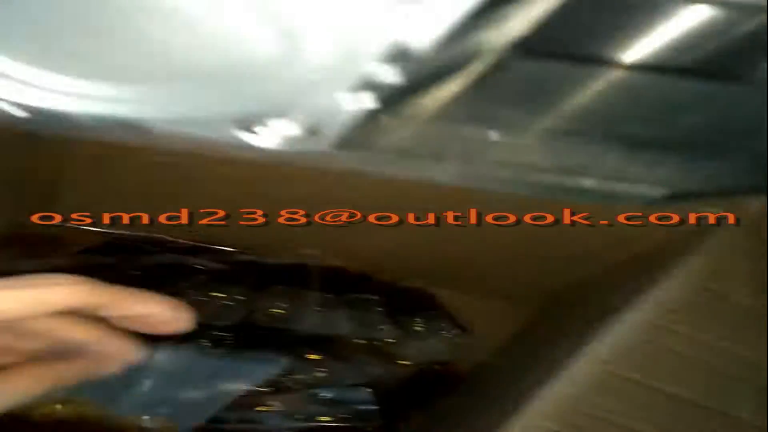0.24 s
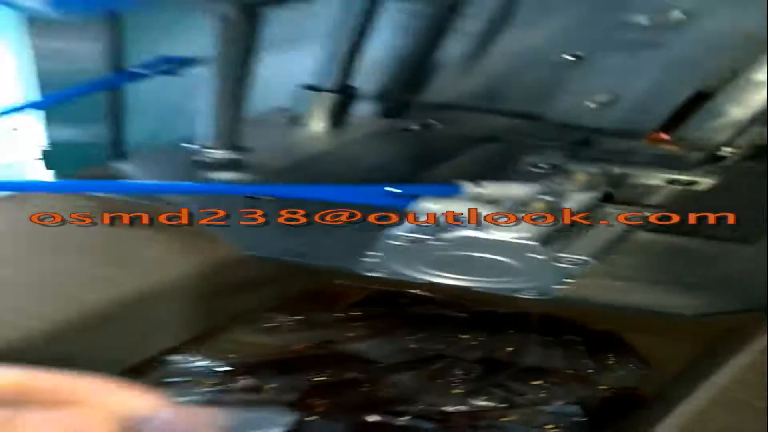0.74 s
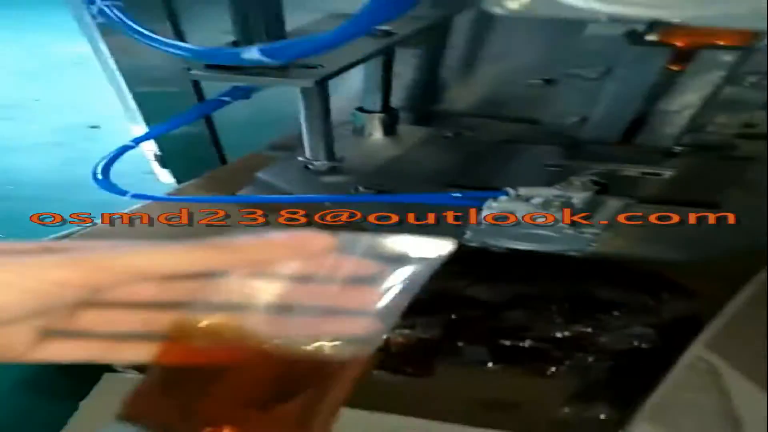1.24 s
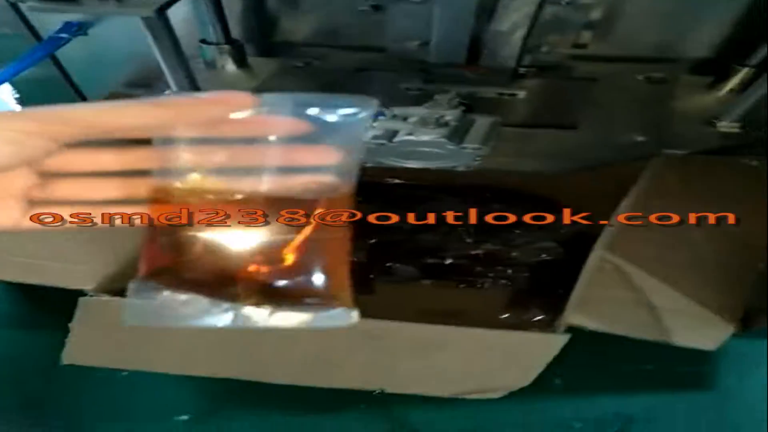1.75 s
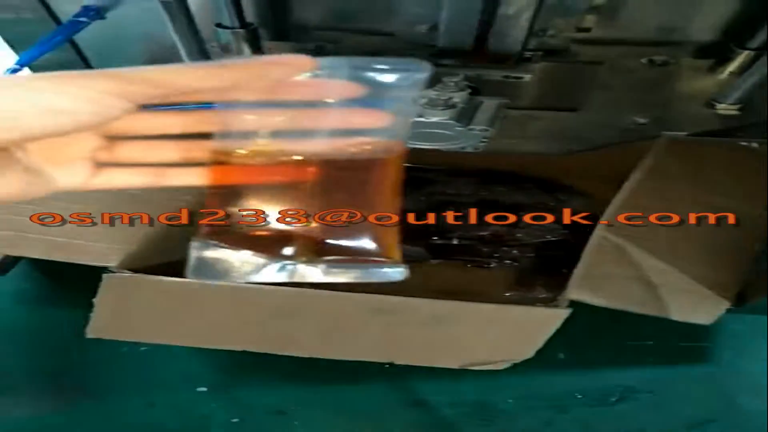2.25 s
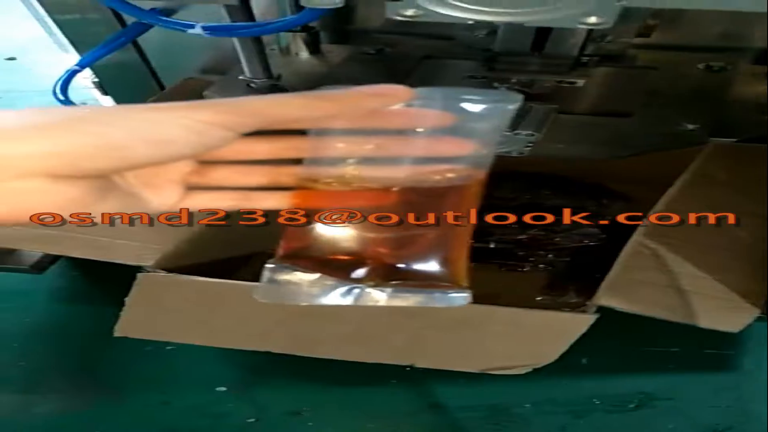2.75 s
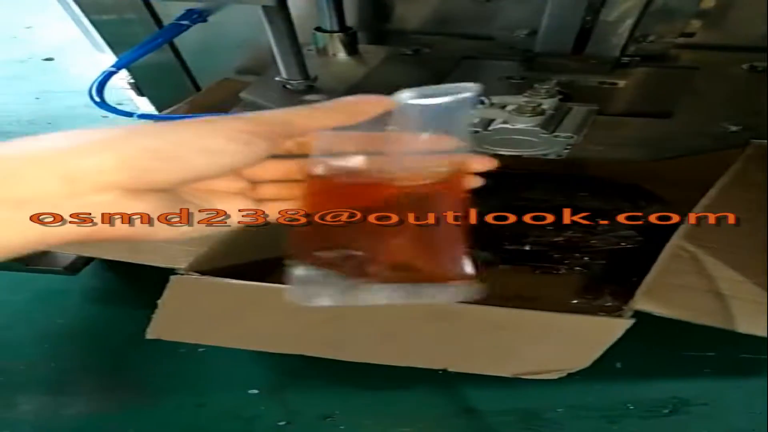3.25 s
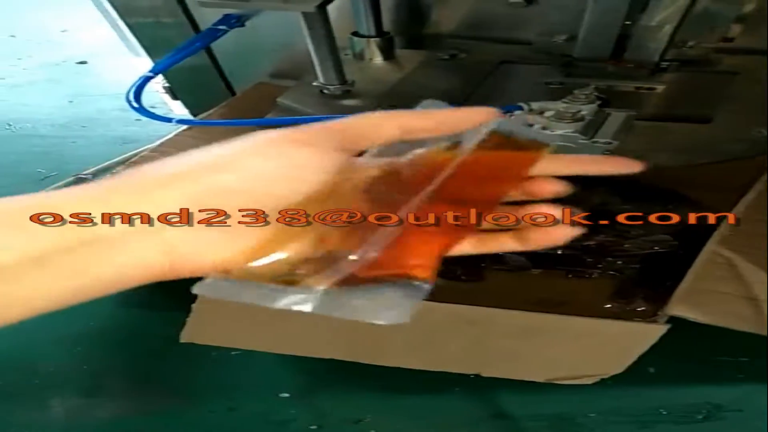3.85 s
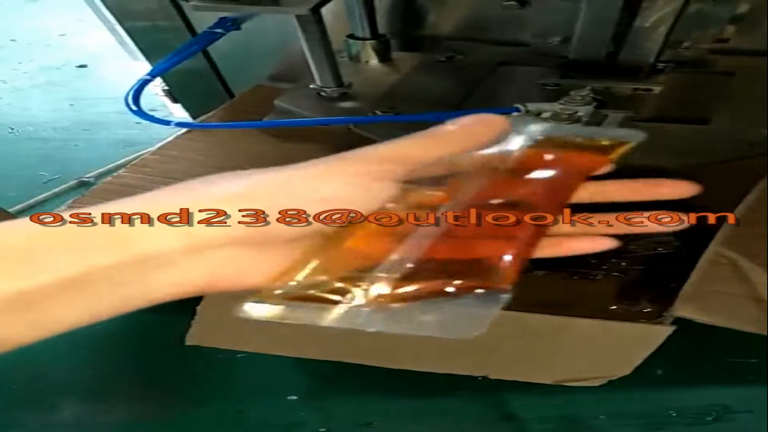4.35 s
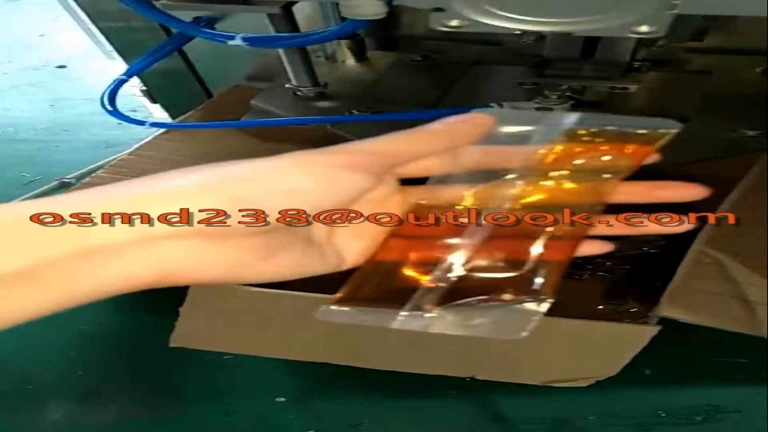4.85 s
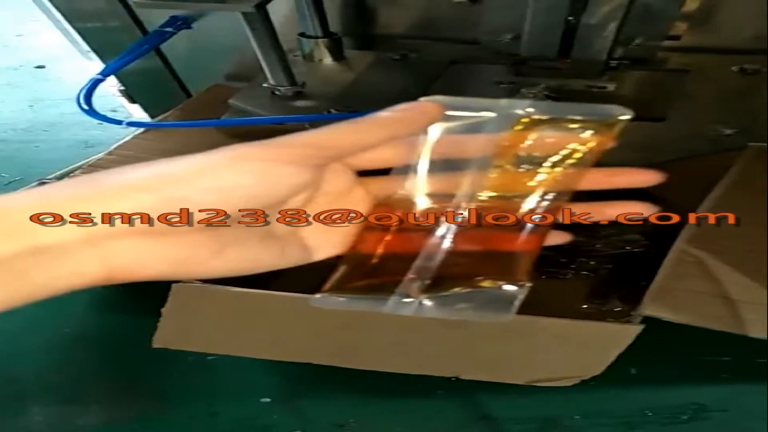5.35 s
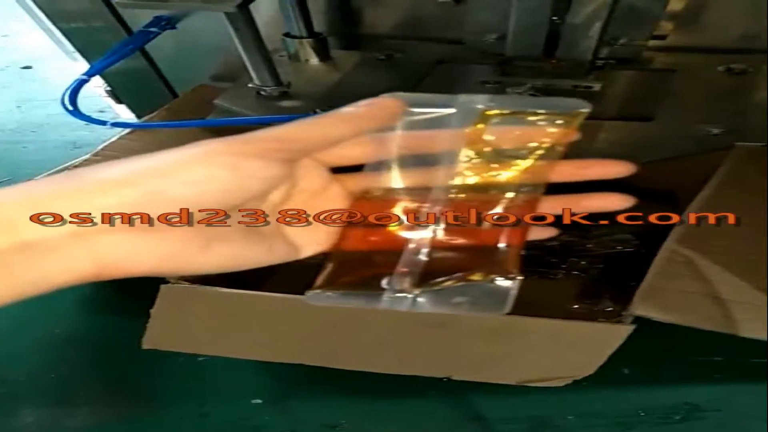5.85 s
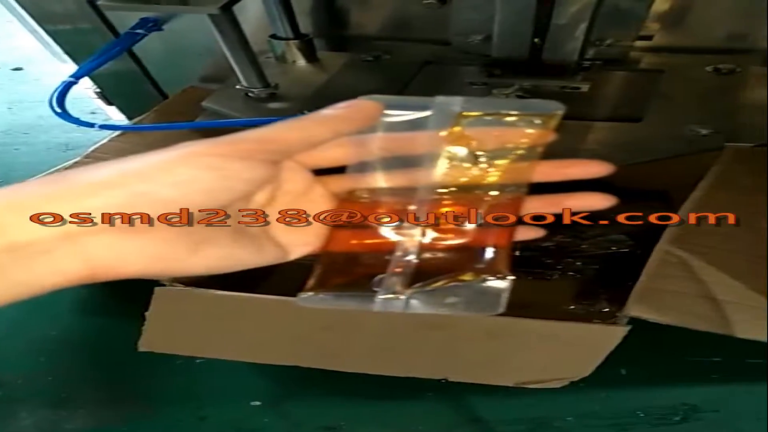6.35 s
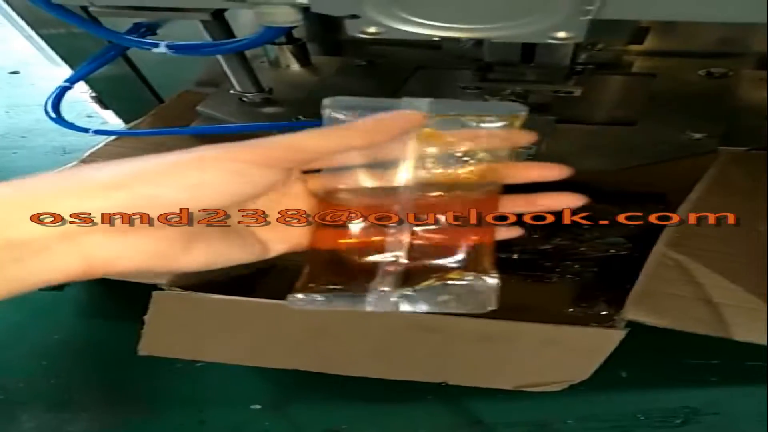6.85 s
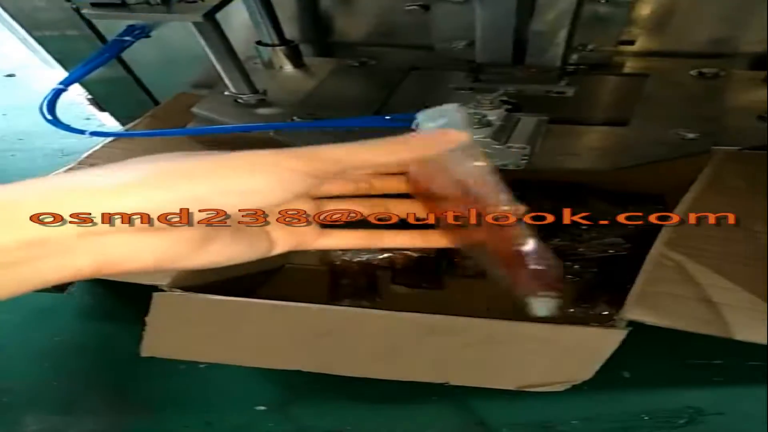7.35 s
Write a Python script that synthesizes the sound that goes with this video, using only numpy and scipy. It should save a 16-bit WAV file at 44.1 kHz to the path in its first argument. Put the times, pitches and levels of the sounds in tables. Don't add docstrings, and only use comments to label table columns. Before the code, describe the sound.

Steady factory machinery: whistling bursts of compressed air, hard metallic clacks, pinging parts and low frame thumps, with a thin air-leak whine behind.

```python
import sys
import numpy as np
from scipy import signal
from scipy.io import wavfile
from scipy.ndimage import uniform_filter1d

SR = 44100
rng = np.random.default_rng(int(sys.argv[2]) if len(sys.argv) > 2 else 0)


def materialize(psi):
    bounded = np.clip(np.atleast_2d(psi).T, -1, 1)
    quanta = np.round(bounded * 32767).astype(np.int16)
    wavfile.write(sys.argv[1], SR, quanta)


N = 335601
PORT_LAG = 20

# start_s, air_db, whistle_db, force_db, jaw_lag_s
CLOSE_STROKES = [(-.371, 2, 8, 3, -0.003), (1.630, 2, 2, -0.5, -0.0043), (3.629, 0.5, 2, 0, -.003),
                 (5.628, 1.5, 2, 1, -0.00029)]
EJECT_STROKES = [(.226, 0.29, 1, 1.1, 0), (2.232, 0.6, 0.84, -0.96, 0), (4.234, 0, 0.14, 0.58, 0),
                 (6.234, 0.026, -1.84, -0.62, 0)]
OPEN_STROKES = [(.677, 4.5, -1.7, 1, -0.0021), (2.675, 1.9, 1, 0, 0.0055), (4.676, 0.5, -0.93, 0.19, 0),
                (6.677, 2, -1.25, 0.017, -0.0009)]
NO_STROKE = [np.zeros(5)]

# time_s, pitch_hz, level_db
DRAINING = [(1.62, 5860, -31), (1.7, 5780, -34), (1.78, 5730, -14), (1.93, 5520, -14), (2.1, 5454, -16.5),
            (2.25, 5276, -15), (2.45, 5280, -18.5), (2.6, 5200, -29)]


def gain_of(db):
    return 10 ** (np.asarray(db) / 20)


def evened(x):
    return x / np.sqrt(np.mean(x ** 2) + 1e-20)


def read(points, hz):
    f, value = np.transpose(points)
    return np.interp(np.log(hz + 1), np.log(f + 1), value)


def along(rows, column):
    rows = np.asarray(rows)
    return np.interp(np.arange(N) / SR, rows[:, 0], rows[:, column])


def add(mix, s, sound):
    part = mix[..., round(s * SR):][..., :sound.shape[-1]]
    part += sound[..., :part.shape[-1]]


def ports(pan_db):
    return gain_of(np.clip(pan_db, -8, 8) * np.array([[.5], [-.5]]))


def resonate(x, hz, width_hz):
    turn = np.exp(2j * np.pi * np.cumsum(hz * np.ones(x.shape[-1])) / SR)
    r = np.exp(-np.pi * width_hz / SR)
    return 2 * (turn * signal.lfilter([1 - r], [1, -r], x / turn)).real


def band(x, lo_hz, hi_hz):
    sos = signal.butter(2, [lo_hz, min(hi_hz, SR / 2.2)], "band", fs=SR, output="sos")
    return signal.sosfilt(sos, x)


def air(spectrum, patchy_db, flutter_db, shift=1, size=512):
    # pitch_hz, share
    likeness = [(30, 0.93), (60, 0.71), (130, 1), (300, 0.92), (600, 0.23), (1500, 0.11), (5000, 0.045),
                (9000, 0.12), (15000, 0.11)]
    # pitch_hz, share of the port lag
    lag_share = [(250, 0.35), (900, 0.93)]
    frames, hz = 4 * N // size + 5, np.fft.rfftfreq(size, 1 / SR)
    a, b, c, d, patches = rng.standard_normal((frames, len(hz), 5)).T
    patches = evened(uniform_filter1d(uniform_filter1d(patches, size=4, axis=0), size=12, axis=1))
    flutter = evened(uniform_filter1d(rng.standard_normal(frames), size=4))
    frame_at = np.minimum(np.arange(frames) * size // 4, N - 1)
    shift = (shift * np.ones(N))[frame_at]
    same = np.clip(read(likeness, hz), 0, 1)[:, None]
    lag = np.exp(-2j * np.pi * hz * read(lag_share, hz) * PORT_LAG / SR)[:, None]
    left = a + 1j * b
    right = same * lag * left + np.sqrt(1 - same ** 2) * (c + 1j * d)
    level_db = read(spectrum, hz[:, None] / shift) + patchy_db * patches + flutter_db * flutter
    z = np.array([left, right]) * gain_of(level_db)
    return evened(signal.istft(z, nperseg=size, noverlap=size - size // 4)[1][:, :N])


def pressure(strokes, column, trim, fade, sag_db_per_s, rest_db, rise_s=0.0097):
    t, power = np.arange(0, N + 32, 32) / SR, gain_of(2 * rest_db)
    for starts, events in strokes:
        for start in starts:
            for event in events:
                age = t - start[0] - event[0]
                hold_s, release_db_per_s = event[3], event[4]
                sag_db = sag_db_per_s * np.clip(age, 0, hold_s)
                release_db = fade * release_db_per_s * np.maximum(age - hold_s, 0)
                db = event[column] + start[trim] - sag_db - release_db
                power = power + (np.clip(age / rise_s, 0, 1) * gain_of(db)) ** 2
    return np.interp(np.arange(N) / SR, t, np.sqrt(power))


def valves():
    # time_s, pitch_hz
    muffler = [(0, 5090), (.6, 5450), (1.1, 5580), (1.6, 5400), (1.7, 5400), (2.4, 5450), (3.3, 5223),
               (3.7, 5310), (4.5, 5474), (5.5, 5287), (6.3, 5376), (7.61, 5610)]
    # pitch_hz, level_db (per Hz)
    whistle_colour = [(3000, -23.5), (4200, -12.5), (4500, -11.5), (5100, -7), (5600, 1.5), (6100, -6.5),
                      (6400, -12), (7300, -24.5), (8500, -37)]
    hiss_colour = [(4000, -30), (6800, 3), (7420, -1), (9600, -7), (14300, -3), (15500, 0), (16000, -30)]
    # after_start_s, hiss_db, whistle_db, hold_s, release_db_per_s
    close_air = [
        (0.0063, -24.5, -30, 0.04, 70.5),
        (-0.0053, -25, -17.5, 0.2, 114),
        (0.037, -23.5, -16.5, 0.2, 115),
        (0.17, -78, -24, 0.69, 70),
    ]
    eject_air = [
        (0, -33, -28, 0.06, 90),
        (.004, -30, -45, 0.04, 90),
        (.03, -36, -26, .22, 100),
    ]
    open_air = [
        (-.006, -29.5, -14, 0.12, 75),
        (0.078, -19.5, -9.5, 0.0042, 285),
        (.3, -43, -27.5, .1, 60),
    ]
    stray_air = [(2.44, -70, -26, 0.15, 200), (2.95, -60, -27, 0.26, 50), (3.18, -44.5, -27.5, .42, 60),
                 (6.49, -48, -20, 0.037, 92.4), (7.095, -16.5, -8.5, 0.0078, 274),
                 (7.131, -37.5, -35, 0.049, 87.7)]
    vents = [(CLOSE_STROKES, close_air), (EJECT_STROKES, eject_air),
             (OPEN_STROKES, open_air), (NO_STROKE, stray_air)]
    sag = 21
    blown = pressure(vents, column=2, trim=2, fade=1, sag_db_per_s=sag, rest_db=-40)
    blown = np.hypot(blown, gain_of(along(DRAINING, column=2) - 2.5))
    whistle = blown * air(whistle_colour, 2.5, 1.2, along(muffler, column=1) / 5400)
    jet = pressure(vents, column=1, trim=1, fade=0.91, sag_db_per_s=sag, rest_db=-53.5, rise_s=.003)
    nozzle = pressure(vents[1:2], column=1, trim=1, fade=1, sag_db_per_s=sag, rest_db=-90)
    hiss = air(hiss_colour, 1.0, 0.85)
    return whistle + jet * hiss + gain_of(6) * nozzle * band(hiss, 12800, 24000)


def blow(db, thud_db, tick_db, ring_hz):
    # pitch_hz, level_db, t60_s (sets the ring; it fades by 60 dB in a ninth of
    steel_modes = [(1654, 1, 0.16), (2274, 1.5, 0.04), (2900, -8, 0.079), (3754, 6, 0.014),
                   (4330, -2.5, 0.48), (5310, 9, 0.14), (5995, 6.5, 0.053), (6580, 0.5, 0.061)]
    t = np.arange(6000) / SR
    contact = rng.standard_normal(len(t)) * np.minimum(t / 0.00021, 1) * np.exp(-t / 0.011)
    steel = 0
    for hz, mode_db, t60 in steel_modes:
        hz = hz * rng.uniform(.95, 1.05)
        mode = resonate(resonate(contact, hz, 20 / t60), hz, 900)
        steel = steel + gain_of(mode_db) * np.sqrt(t60) * mode
    ring = resonate(resonate(contact, ring_hz, 180), ring_hz, 2300)
    crack = band(band(contact, 1900, 5500), 1900, 5500)
    push = rng.standard_normal(len(t)) * np.minimum(t / 0.0061, 1) * np.exp(-t / 0.0087)
    thud = band(push, 94, 940)
    tick = band(contact * np.exp(-t / .012), 6500, 15500)
    parts = [(-0.5, steel), (-5.0, crack), (-10.5, ring), (thud_db, thud), (tick_db, tick)]
    return gain_of(db) * sum(gain_of(part_db) * part / abs(part).max() for part_db, part in parts)


def snap(db, hz):
    t = np.arange(2500) / SR
    crack = rng.standard_normal(len(t)) * np.minimum(t / 0.00012, 1) * np.exp(-t / 0.0018)
    sound = evened(band(crack, 3500, 12000)) + .8 * evened(resonate(crack, hz, 500))
    return gain_of(db) * sound / abs(sound).max()


def jaws():
    # after_start_s, peak_db, thud_db, tick_db, ring_hz
    close_blows = [
        (0.0762, -5, -12.5, -36, 4300),
        (0.1715, -3, -5, -46, 5070),
        (.442, -15, -18, -48, 4870),
    ]
    eject_blows = [
        (-.004, -21, 3.1, -20, 3000),
    ]
    open_blows = [(0.0519, -6, -19, -39, 4880), (0.0867, -5.5, -37, -6.5, 4420),
                  (0.1673, -22, 8, -24, 4640), (.224, -18, -4.5, -43, 4000), (.237, -7.5, -13, -51, 4130),
                  (.341, -16.5, -5.5, -40, 4230)]
    stray_blows = [(0.522, -26, 7.5, 1, 2360), (0.7985, -13, -6, -2, 4850), (0.925, -13, -28, -47, 5760),
                   (4.398, -14.5, -34, -32, 4860), (5.0687, -16, -24, -33, 4030),
                   (6.493, -16.5, -3.5, -45, 4675), (7.102, 0.5, -41, -41, 5030)]
    # time_s, peak_db, pitch_hz, left_minus_right_db
    snaps = [(0.677, -17, 6330, 9), (1.071, -3, 5100, 12), (1.63, -28, 5550, 19), (2.525, -18.5, 5440, 8),
             (2.675, -23, 5640, 8), (3.069, -19, 5860, 9), (3.629, -21, 5600, 5), (4.6754, -28, 4700, 10),
             (5.07, -21, 4460, 10.5), (5.7995, -6, 4930, 10), (5.6282, -37, 5470, 11),
             (6.6764, -23, 4880, 6.5), (7.0627, -19, 5650, 13), (0.7643, -4, 5200, 8),
             (2.765, -6, 4200, -1), (4.763, -3, 5000, 8), (6.7646, 3, 4420, 9), (2.844, -13, 3950, 5),
             (2.9173, -16, 3970, 3), (4.9173, -26, 4400, 2), (6.915, -20, 4380, 5), (3.0189, -22, 3800, -1),
             (7.125, -9, 4970, 7), (7.135, -12, 4570, 2)]
    metal = np.zeros((2, N))
    for starts, blows in [(CLOSE_STROKES, close_blows), (EJECT_STROKES, eject_blows),
                          (OPEN_STROKES, open_blows), (NO_STROKE, stray_blows)]:
        for start, _, _, force_db, lag in starts:
            for after, db, thud_db, tick_db, ring_hz in blows:
                sound = blow(db + force_db, thud_db, tick_db, ring_hz)
                pan_db = 3 + 3 * rng.standard_normal()
                if start + after > 0:
                    add(metal, start + lag + after, sound * ports(pan_db))
    for s, db, hz, pan_db in snaps:
        add(metal, s, snap(db, hz) * ports(pan_db))
    return metal


def rod(db, hz, length):
    t = np.arange(0, length, 1 / SR)
    shape = signal.windows.tukey(len(t), .3) * np.exp(-t / .3)
    return gain_of(db + 3) * np.sin(2 * np.pi * hz * t) * shape


def ping(db, hz, t60):
    t, fade_s = np.arange(0, min(t60, .11), 1 / SR), min(t60, .11)
    cluster = 0
    for factor, share in [(1, 1), (1.035, .55), (.955, .4)]:
        cluster = cluster + share * np.sin(2 * np.pi * (hz * factor * t + rng.random()))
    return gain_of(db - 4 - 60 * t / fade_s) * np.minimum(t / .0012, 1) * cluster


def ringing_parts():
    # after_start_s, level_db, pitch_hz, length_s
    rods = [
        (0.064, -35, 1660, 0.066),
        (0.233, -29.5, 2870, 0.12),
        (.25, -37, 4020, 0.081),
    ]
    rod_drive = [-10, -0.5, 4.5, 1.5]
    # time_s, level_db, pitch_hz, length_s
    hums = [(.0, -29, 380, .2), (.03, -30, 665, .26), (0, -27, 195, .05), (.49, -32, 245, .08),
            (.65, -35, 420, .07), (3.3, -44, 269, .22), (5.14, -48, 2143, .3), (5.25, -52, 2363, .3),
            (.2, -43, 970, .28), (.6, -34, 385, .07), (3.42, -50, 1960, .18), (3.97, -42, 2010, .1),
            (4.19, -44, 2000, .4), (5.12, -34, 5440, .25), (5.33, -38, 5465, .3), (5.3, -40, 4625, .33),
            (6.48, -34, 5160, .18), (2.925, -31, 3980, .12), (5.62, -30, 5470, .1)]
    # time_s, peak_db, pitch_hz, t60_s
    pings = [(.728, -8.5, 4350, 0.055), (0.74, -1, 5220, 0.056), (0.747, -4, 5700, .06),
             (.766, -3, 5150, 0.055), (0.781, -12, 1675, .06), (0.903, -8, 5820, 0.054),
             (.928, -3, 5760, 0.07), (.925, -15.5, 2090, 0.14), (.987, -16.5, 4870, .04),
             (1.0224, -20.5, 2180, 0.055), (1.704, -13.5, 2380, 0.089), (1.806, -11, 1656, .05),
             (2.069, -12.5, 2780, .03), (2.9001, -19, 2200, .05), (2.9168, -10.5, 4310, .04),
             (3.7028, -13, 2470, 0.086), (3.804, -5, 5440, 0.035), (4.7662, -11.5, 1650, 0.11),
             (4.8938, -13, 4340, 0.032), (4.918, -18, 4220, 0.038), (4.929, -12, 4020, .06),
             (5.071, -8, 4080, .03), (5.7082, -13.5, 2450, 0.12), (5.8006, -7, 1660, 0.04),
             (5.806, 0, 3670, 0.036), (5.807, -6, 4880, 0.055), (5.802, -3, 5630, 0.06),
             (5.706, -5, 4430, .05), (6.0709, -8, 2840, 0.021), (6.7277, -1, 4950, .06),
             (6.776, -10, 4060, .06), (6.914, -22, 4360, 0.025), (7.015, -16.5, 1470, .04),
             (7.049, -6, 5400, 0.068), (7.1014, -13.5, 2330, 0.094), (7.124, 2, 3200, .03)]
    rings = np.zeros((2, N))
    for start, drive_db in zip(OPEN_STROKES, rod_drive):
        for after, db, hz, length in rods:
            add(rings, start[0] + after, rod(db + drive_db, hz, length))
    for s, db, hz, length in hums:
        add(rings, s, rod(db, hz, length))
    for s, db, hz, t60 in pings:
        add(rings, s, ping(db, hz, t60) * ports(3))
    return rings


def thumps():
    # after_start_s, peak_db, pitch_hz, t60_s
    close_thumps = [(-.008, -23, 273, 0.11), (-.008, -35.5, 59.5, .15), (.002, -24.5, 165.6, 0.17),
                    (0.043, -29, 55, 0.18), (.058, -31, 266, .12), (0.097, -24, 277, 0.13),
                    (0.172, -32.5, 165, .2), (.168, -23, 410, 0.095), (.17, -32, 629, 0.085),
                    (.169, -17, 860, .07), (.186, -24, 273, 0.091), (.243, -27, 75, 0.23),
                    (0.314, -27, 261, 0.24)]
    eject_thumps = [
        (-.006, -25, 269, 0.117),
        (.004, -35.5, 150, 0.29),
        (-0.024, -32, 99, 0.22),
        (.26, -38, 140, .4),
    ]
    open_thumps = [(-.014, -26.5, 81, 0.14), (0.044, -29.5, 63.7, 0.144), (0.044, -26, 163, 0.21),
                   (.12, -20, 150.8, 0.24), (.13, -25.5, 266.7, .4), (.215, -24, 143, 0.29),
                   (.25, -24, 273.4, 0.22), (.3, -28, 65, .2), (0.387, -20.5, 146, 0.13),
                   (.395, -24.5, 264.5, 0.22), (0.431, -28.5, 276, 0.51)]
    stray_thumps = [(.005, -29, 55, .3), (0.218, -20.5, 78.5, 0.16), (.44, -28, 69.6, 0.23),
                    (3.521, -31, 70.2, 0.16), (5.47, -39, 54.9, 0.28), (7.4, -36, 50, 0.22),
                    (7.505, -36, 80, .15)]
    out, t = np.zeros(N), np.arange(0, .5, 1 / SR)
    swell = np.sin(np.pi / 2 * np.minimum(t / 0.0084, 1)) ** 2
    for starts, knocks in [(CLOSE_STROKES, close_thumps), (EJECT_STROKES, eject_thumps),
                           (OPEN_STROKES, open_thumps), (NO_STROKE, stray_thumps)]:
        for start, _, _, force_db, _ in starts:
            for after, db, hz, t60 in knocks:
                if start + after > 0:
                    fade = gain_of(db + force_db + 3 - 60 * t / t60)
                    add(out, start + after, swell * fade * np.sin(2 * np.pi * hz * t))
    return out


def frame():
    # pitch_hz, level_db (per Hz)
    rumble_colour = [(53, -53), (90, -17), (135, -0.5), (220, -4.5), (259, -3), (394, -12.5), (429, -15.5),
                     (480, -11.5), (595, -18.5), (700, -22), (910, -75), (1540, -120)]
    body_colour = [(240, -34), (400, 5), (557, -0.5), (799, 6), (1430, -3), (1650, -1), (1930, -1),
                   (2390, 1.5), (3130, 1), (4400, -3.5), (5720, -37), (9680, -120)]
    shake_colour = [(10, -28), (25, 1), (42, 4.5), (55, 0), (80, -3), (110, -2.5), (200, -72)]
    # after_start_s, rumble_db, air_body_db, hold_s, release_db_per_s
    close_load = [
        (-.008, -24.5, -26, 0.13, 153),
        (0.181, -19.5, -28.5, 0.028, 302),
        (0.242, -26, -32, 0.059, 39),
    ]
    eject_load = [
        (-.004, -28.5, -31.5, .03, 65),
        (.05, -54, -37.5, .25, 88.5),
        (0.267, -34, -44.5, .05, 80),
    ]
    open_load = [(-.018, -31, -34.5, 0.053, 200), (0.041, -25, -24.5, 0.043, 200),
                 (0.119, -20.5, -27.5, 0.11, 75), (.235, -32, -30, 0.022, 65.4),
                 (.387, -21, -30.5, 0.011, 350), (0.419, -24.5, -32, 0.029, 84)]
    stray_load = [
        (0, -37, -32, 0.24, 81),
        (0.299, -35.5, -34.5, 0.13, 78.8),
        (7.099, -45, -37, 0.032, 350),
    ]
    loads = [(CLOSE_STROKES, close_load), (EJECT_STROKES, eject_load),
             (OPEN_STROKES, open_load), (NO_STROKE, stray_load)]
    sag, shake_db = -3, -11
    rumble = pressure(loads, column=1, trim=3, fade=1, sag_db_per_s=sag, rest_db=-70)
    body = pressure(loads, column=2, trim=3, fade=0.61, sag_db_per_s=sag, rest_db=-60)
    shake = pressure(loads, column=2, trim=3, fade=0.49, sag_db_per_s=sag, rest_db=-53 - shake_db)
    rumble = gain_of(-3.5) * rumble * air(rumble_colour, 1.76, 0.76, size=1024)
    body = body * air(body_colour, 2.5, 1.5)
    shake = gain_of(shake_db) * shake * air(shake_colour, 0.27, 2.6, size=4096)
    return thumps() + rumble + body + shake


def whine(hz, level_db, tones, steady=0):
    turns, out = np.cumsum(hz) / SR, 0
    for factor, db, width_hz in tones:
        slow = signal.butter(2, width_hz / 2, fs=SR, output="sos")
        drift = signal.sosfilt(slow, rng.standard_normal((2, 2, N)))
        drift[0] += steady * drift[0].std()
        angle = 2 * np.pi * factor * turns
        out = out + gain_of(db) * evened(drift[0] * np.cos(angle) + drift[1] * np.sin(angle))
    return gain_of(level_db) * out


def leaks():
    # time_s, pitch_hz, clean_db, smeared_db, upper_db
    leak = [(2.4, 5100, -72, -55, -64), (2.55, 5120, -30, -32, -41), (2.75, 4876, -30, -30, -41),
            (3.0, 4865, -40, -21, -33.5), (3.25, 4754, -50, -27.5, -39), (3.6, 4820, -34, -44, -49),
            (3.85, 4770, -40, -26, -33), (4.03, 4906, -36, -30, -30.5), (4.07, 4880, -20.5, -30, -28),
            (4.14, 4890, -31, -38, -32), (4.22, 4730, -33, -30, -35), (4.4, 4710, -21.5, -33, -32.5),
            (4.55, 4676, -38.5, -37, -35), (4.75, 4655, -21.5, -61, -44), (5.0, 4586, -34.5, -23, -42),
            (5.15, 4610, -26, -42, -35.5), (5.4, 4610, -44, -56, -41), (5.6, 4610, -36, -46, -45),
            (5.95, 4720, -31, -35, -34), (6.2, 4695, -29, -36, -36.5), (6.33, 4700, -24.5, -30, -35),
            (6.42, 4725, -40, -35, -36), (6.55, 4720, -34, -46, -34), (6.75, 4740, -28, -38, -36),
            (7.16, 4735, -37, -29, -36), (7.19, 4710, -21.5, -31, -36), (7.42, 4680, -31, -46, -47),
            (7.61, 4700, -47, -48, -31.5)]
    # multiple, level_db, width_hz
    overtones = [(1.1, -11, 60), (1.182, 1, 34), (1.232, -4, 60), (1.28, -1, 400)]
    # time_s, pitch_hz, level_db
    in_carton = [(0, 4406, -34), (.2, 4415, -30), (.4, 4450, -27.5), (.5, 4500, -42), (.62, 4520, -53)]
    hz = along(leak, column=1)
    waver = uniform_filter1d(uniform_filter1d(rng.standard_normal((2, N)), size=3000), size=3000)
    waver_db = 2.2 * evened(waver)
    lowest = whine(hz, along(leak, column=2) + waver_db[0], [(1, -1, 90)], steady=1.2)
    smeared = whine(hz, along(leak, column=3), [(1, 0, 240)])
    upper = whine(hz, along(leak, column=4) + waver_db[1], overtones, steady=0.65)
    low_down = whine(along(in_carton, column=1), along(in_carton, column=2),
                     [(.985, -2, 90), (1.03, 0, 350)])
    drain = whine(along(DRAINING, column=1), along(DRAINING, column=2),
                  [(0.97, -5.5, 64), (.945, -14.5, 220), (1.03, -7.5, 520)])
    return lowest + smeared + upper + low_down + drain


def hall(x):
    # pitch_hz, t60_s
    ring_time = [(100, .9), (1000, .6), (5000, .5), (8000, .25), (15000, .15)]
    taps = np.zeros((2, SR))
    at = np.arange(300, SR - 20, 20) + rng.integers(0, 20, (2, (SR - 301) // 20))
    np.put_along_axis(taps, at, rng.choice([-1., 1.], at.shape), 1)
    hz, t, z = signal.stft(taps, SR, nperseg=256)
    fade = gain_of(-60 * t / read(ring_time, hz)[:, None])
    tail = signal.istft(z * fade, SR, nperseg=256)[1]
    return signal.fftconvolve(x, tail / np.linalg.norm(tail[0]), axes=1)[:, :N]


def murmur():
    # pitch_hz, level_db (per Hz)
    murmur_colour = [(35, -38), (60, -11.5), (334, -9), (531, -15.5), (1450, -17.5), (2300, -11.5),
                     (4300, -6.5), (5590, -39), (9460, -120)]
    return gain_of(-42) * air(murmur_colour, 0.45, 0.87, size=1024)


def scene():
    # time_s, level_db
    nearness = [(0, -2), (.6, 0.3), (1.1, 0.64), (1.3, -1.5), (1.58, -1), (1.7, 0), (2.6, -0.16), (3.2, 0),
                (3.6, -0.5), (4.2, -0.5), (5.1, 0), (5.55, -2.5), (6.2, 0.25), (7.2, -0.2), (7.61, -2)]
    metal = jaws()
    near = metal + ringing_parts()
    near[1] = np.roll(near[1], PORT_LAG)
    heard = valves() + near + frame() + leaks() + gain_of(-5.5) * hall(metal) + murmur()
    return gain_of(along(nearness, column=1)) * heard


def thinned(x):
    # treble_db, edge_hz
    edge = [(-53, 13400), (-45, 13950), (-40, 14400), (-35, 15000), (-23, 15300), (-19, 15800)]
    # pitch_hz, level_db
    masked = [(1500, -4.5), (2300, -1), (4300, -.3), (4600, -4.5), (6000, -4.5), (6400, -.3), (7000, 1.3),
              (15000, 1.3)]
    hz, t, z = signal.stft(x, SR, window="cosine", nperseg=2048)
    power = (abs(z) ** 2).mean(0) + 1e-20
    treble_db = 10 * np.log10(2 * power[hz > 7500].sum(0))
    edge_hz = 340 * np.round(np.interp(treble_db, *np.transpose(edge)) / 340)
    flat = power / np.exp(uniform_filter1d(np.log(power), size=40, axis=0))
    whim = gain_of(2.5 * rng.standard_normal(flat.shape))

    def grouped(n):
        middle = np.minimum(np.arange(len(hz)) // n * n + n // 2, len(hz) - 1)
        return (uniform_filter1d(flat, size=n, axis=0) * whim)[middle]

    bands = np.where(hz[:, None] < 7000, grouped(6), grouped(12))
    bands = uniform_filter1d(bands, size=2, axis=1)
    spared = np.where(hz[:, None] > 6800, gain_of(-.045 * np.clip(treble_db + 56, 0, 30)), 1)
    strong = bands > gain_of(2 * read(masked, hz))[:, None] * spared
    keep = (hz[:, None] < edge_hz) & strong
    return signal.istft(z * keep, SR, window="cosine", nperseg=2048)[1][:, :N]


def roll_off(x):
    return signal.sosfilt(signal.butter(12, 15770, fs=SR, output="sos"), x)


def record(dry):
    mix = thinned(np.clip(dry, -1, 1))
    return roll_off(mix)


dry = scene()
out = record(dry)
materialize(out)
```